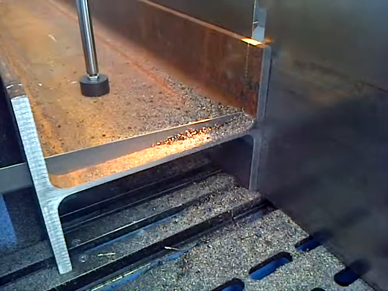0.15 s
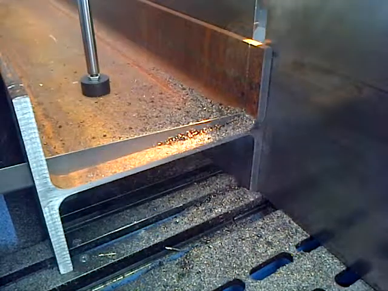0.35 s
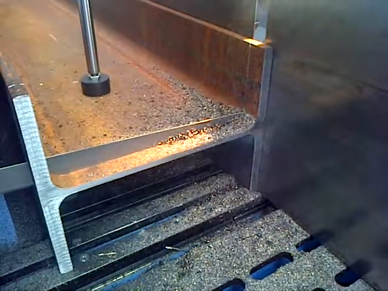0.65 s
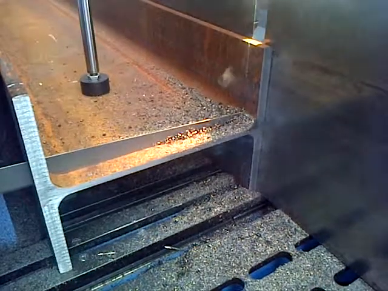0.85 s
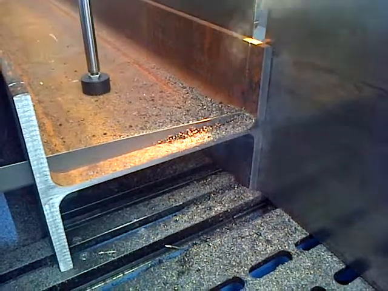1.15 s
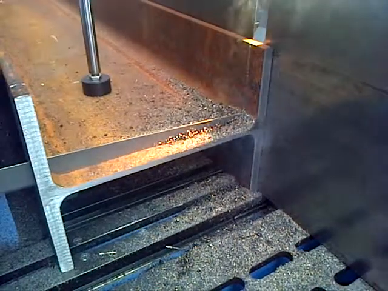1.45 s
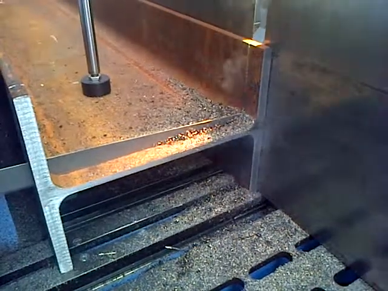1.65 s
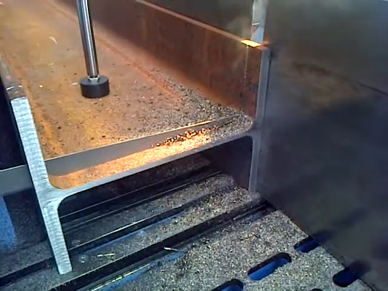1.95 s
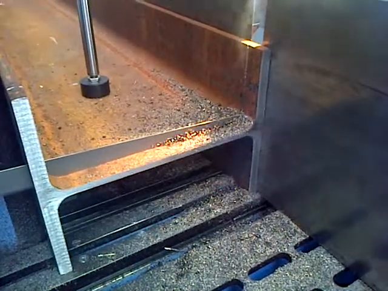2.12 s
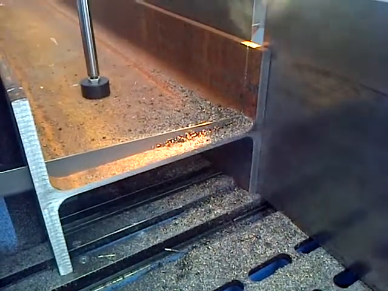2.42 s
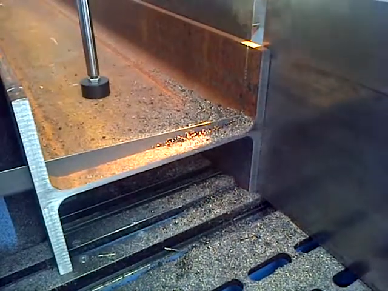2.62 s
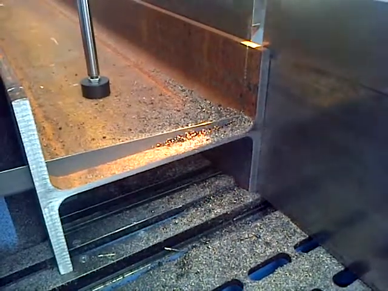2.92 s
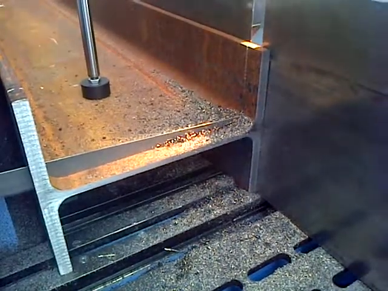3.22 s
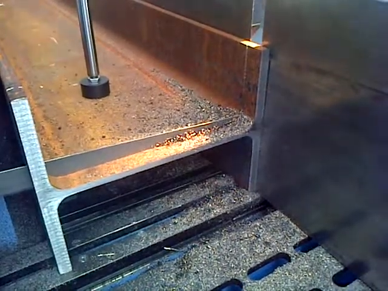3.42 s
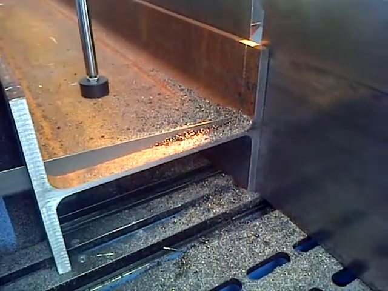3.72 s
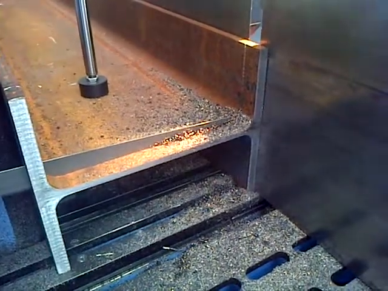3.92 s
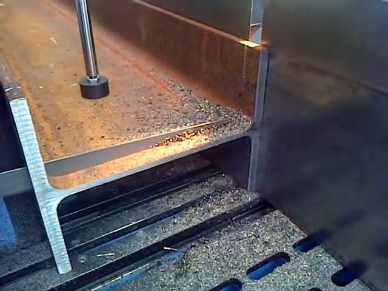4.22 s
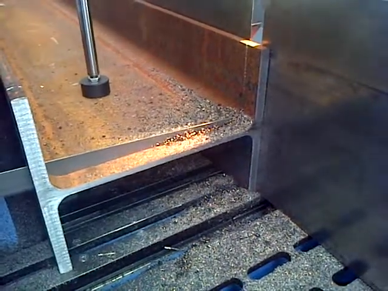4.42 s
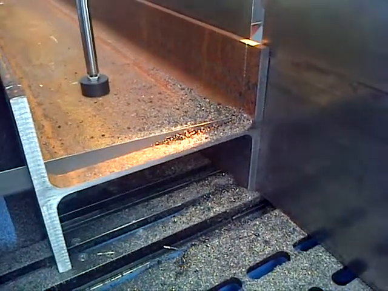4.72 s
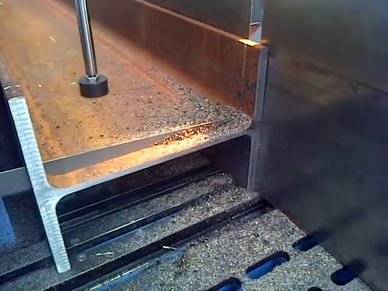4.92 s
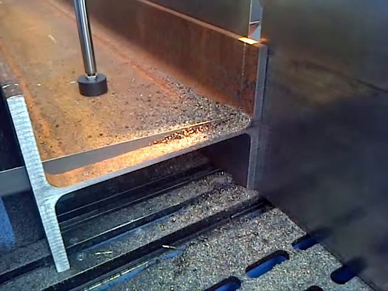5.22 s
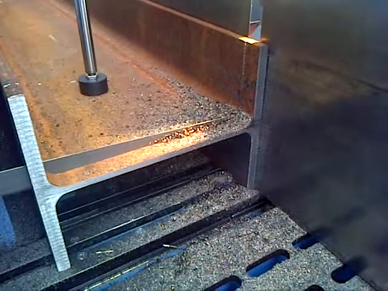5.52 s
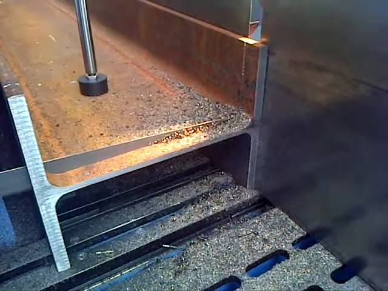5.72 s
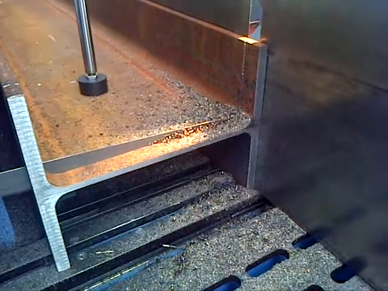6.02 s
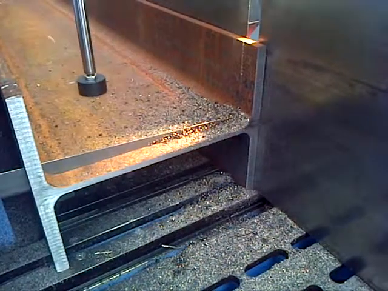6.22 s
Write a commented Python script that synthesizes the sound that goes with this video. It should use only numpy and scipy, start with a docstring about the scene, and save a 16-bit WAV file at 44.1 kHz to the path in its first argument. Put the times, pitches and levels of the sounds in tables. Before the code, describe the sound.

Steady sawing of a steel beam in a workshop: dense midrange hiss, faint ringing tones, pulsing low hum, then growing tooth chatter and rough whining.

```python
"""A band saw works through a steel beam in a workshop: noise and small cracks make an even hiss of chips. At
first roughened tones hold for a while and fade, over a motor hum with a slow beat in it. Brief pure notes and
gritty snags stand out now and then. From about two seconds a faint chatter builds up, a cycle of partials
repeating with the tooth pattern, and the hum grows with it. One partial of the chatter whines, swelling in
rough bursts through the second half. Low rumble lies beneath it all."""
import sys
import numpy as np
from scipy import signal
from scipy.fft import rfft, irfft
from scipy.io import wavfile
from scipy.ndimage import map_coordinates

SR = 44100
rng = np.random.default_rng(int(sys.argv[2]) if len(sys.argv) > 2 else 0)


def master(y):
    """Save y as 16-bit WAV."""
    cut = np.clip(np.atleast_2d(y).T, -1, 1)
    pcm = np.round(cut * 32767)  # scale
    wavfile.write(sys.argv[1], SR, pcm.astype(np.int16))


N = 280476
T = np.arange(N) / SR  # time, s

# slow course of the cutting force, as a level: time_s, level_db
FORCE_COURSE = [(0, -18.5), (.8, -19), (2, -19), (2.9, -19.5), (3.9, -19), (4.6, -19), (5.2, -19),
                (6.36, -19)]
# brief rises and dips in the loudness of the cut: centre_s, change_db, half_length_s
LOUDNESS_BUMPS = [(0.01, 2, 0.04), (0.157, 1, .03), (0.278, 1, 0.021), (0.355, -1, .025),
                  (.497, 1.5, 0.034), (.587, -0.5, 0.023), (.65, 1.6, 0.021), (0.77, -1, 0.018),
                  (0.943, 2, 0.028), (1.015, -0.8, .025), (1.077, 1, 0.033), (1.46, -0.5, 0.051),
                  (1.606, 1.5, 0.022), (1.703, 1.5, 0.02), (1.765, -0.7, .025), (1.91, -2, 0.022),
                  (1.953, 1.5, .02), (2.086, 1.4, 0.023), (2.348, 0.5, .03), (2.496, -1, 0.025),
                  (2.702, 1.5, 0.023), (3.063, -1.5, 0.026), (3.223, 0.9, 0.023), (3.341, -1.2, 0.019),
                  (3.508, -2, 0.065), (3.623, 1.5, 0.023), (3.97, -1, 0.014), (4.116, 1, 0.049),
                  (4.21, -1, 0.018), (4.754, 1.5, 0.026), (4.886, 1, .03), (5.008, -0.5, 0.047),
                  (5.422, -0.9, 0.022), (5.71, -1, .025), (5.81, 0.9, .045), (6.145, 1.1, 0.027)]
# relative spectrum of the chip hiss: frequency_hz, density_db (per Hz)
HISS_SPECTRUM = [(120, -49.5), (200, -22), (270, -9), (350, -4.5), (500, -3), (900, -2.5), (1300, -2.5),
                 (1750, 0), (2250, -2.5), (2600, -6.5), (3500, -11.5), (4300, -13), (5800, -27),
                 (7000, -35.5)]
# resonances and dips of the beam that colour the hiss: centre_hz, width_hz, boost_db
BEAM_RESONANCES = [(348, 19, -1.5), (422, 20, -4), (482, 33, 3), (720, 60, -1.5), (906, 35, -2.5),
                   (1677, 67, 1), (2120, 70, -1.5), (2270, 88, 1.5), (2423, 77, -2.5), (2620, 50, 1.5),
                   (2750, 51, -2.5), (3290, 110, 1), (3465, 70, -2), (3560, 150, 1.5), (3980, 130, 1.5),
                   (4240, 50, 1.5), (4170, 140, 1.5), (4900, 55, 5.5), (5190, 110, 4.5), (5440, 90, 0),
                   (6200, 90, 3.5)]
# pitch of the blade's bright resonance in the slot: time_s, pitch_hz
SLOT_PITCH = [(0.0, 2970), (1.43, 3164), (3.79, 3120), (4.76, 3046), (6.36, 3060)]
# strength of the slot's resonance against the hiss: time_s, level_db
SLOT_LEVEL = [(0, -8), (.3, -5.5), (.55, -9.5), (1.1, -6.5), (1.35, -11.5), (1.6, -9), (2.3, -7), (2.7, -8),
              (3.25, -9), (3.55, -11), (3.8, -10), (4.25, -9.5), (4.55, -10.5), (4.85, -10), (5.05, -11.5),
              (5.3, -11), (5.65, -10), (5.82, -8.3), (6.36, -11)]
# roughened tones that hold for a while and fade, level before the cut's loudness acts:
# start_s, end_s, pitch_hz, width_hz, level_db (rms)
HELD_TONES = [(-0.14, .93, 596, 5.7, -31), (0.73, 1.89, 597, 4.06, -28), (-.5, .58, 617, 8.8, -27.5),
              (-.8, 2.1, 843, 6, -32), (-0.5, 1.44, 893, 7, -34.5), (1.6, 3.6, 893, 4, -36.5),
              (-.8, 1.4, 1066, 4, -30.5), (1.5, 2.15, 1066, 4, -32), (-1.5, 1.6, 990, 10, -33),
              (-.5, 2.06, 1030, 13.9, -34), (3, 3.2, 951, 4, -37), (5, 5.55, 759, 4, -30.5),
              (2, 4.4, 818, 13.85, -35.5), (0.5, 3.1, 1974, 10, -33), (0, 1.5, 2045, 12, -34.5),
              (2, 3.05, 2008, 14, -33.5), (0.5, 1.3, 2128, 10, -37), (0, 1.4, 2210, 10, -34),
              (-0.5, 0.41, 1635, 14, -29), (.1, 2.8, 1695, 16.1, -35.5), (1.3, 3.1, 1778, 16, -35),
              (3.5, 4.66, 1558, 9, -34.5), (3, 4.6, 1634, 9, -33.5), (3.5, 4.4, 1785, 5.9, -37),
              (3.5, 4.8, 1915, 16.1, -35), (5.5, 6.15, 1787, 9.3, -31)]
# hum of the motor and coolant pump, level before the load acts: pitch_hz, level_db (rms)
HUM_LINES = [(150, -62.5), (200, -56), (249.9, -36), (449.9, -37), (499.8, -35.5), (599.4, -37.5)]
# one line of the hum comes and goes: time_s, level_db (rms)
DRONE_LEVEL = [(0, -38), (1.4, -38), (2.12, -41), (2.35, -31.5), (2.75, -30.5), (3, -41), (3.25, -33),
               (3.42, -45), (3.6, -31), (3.8, -40), (5, -41), (5.35, -37), (6.36, -41.5)]
# crests of the throb, where a second tone falls in step with the hum line: crest_s, level_db (rms)
THROB_CRESTS = [(-.15, -37), (.36, -29.5), (.88, -30.5), (1.35, -29.5), (1.85, -31.5), (2.34, -26),
                (2.8, -28.5), (3.3, -27), (3.83, -26), (4.32, -26.5), (4.86, -29), (5.33, -24.5),
                (5.75, -24.5), (6.22, -29), (6.7, -28)]
# relative spectrum of the workshop rumble: frequency_hz, density_db (per Hz)
SHOP_SPECTRUM = [(20, 1.5), (60, -4.5), (130, 1.5), (300, -5), (1000, -22)]
# a tooth snags on a chip: start_s, centre_hz, width_hz, peak_db, length_s
SNAGS = [(.255, 3200, 250, -26, .03), (3.208, 1900, 900, -16, 0.0072), (3.216, 840, 400, -26, 0.068),
         (3.225, 800, 900, -16, .005), (5.78, 3100, 150, -28, .04), (5.78, 1790, 120, -26, .13)]
# brief, nearly pure notes that stand out of the cut and hum:
# centre_s, pitch_hz, glide_hz_per_s, peak_db (rms), half_length_s
BRIEF_NOTES = [(.273, 832, 0, -24.5, .035), (.505, 1070, 0, -24, 0.038), (.52, 853, 0, -27.5, .04),
               (.633, 1981, -0.5, -27, .03), (.94, 837, 0, -28, .035), (1.179, 1066, 0, -27, .04),
               (2.072, 755, -700, -22, 0.025), (2.898, 377, 0, -25.5, 0.037),
               (2.896, 1955, -500, -24, .025), (3.267, 600, 0, -27, .04), (3.396, 1570, 0, -28.5, .035),
               (3.779, 1630, 0, -26, .035), (4.058, 894, 0, -28, .035), (5.85, 599, -1, -28, 0.055),
               (5.306, 1314, 0, -28, .03), (5.514, 2230, 0, -28, .03)]
# strongest partials of the chatter, level before its build-up and the cut's loudness act:
# multiple (of the tooth pattern rate), level_db (rms)
CHATTER_PARTIALS = [(27, -37), (30, -33.5), (33, -37), (36, -38.5), (37, -38), (40, -33.5), (41, -36.5),
                    (42, -36.5), (45, -33), (46, -37.5), (48, -38), (51, -32.5), (52, -35), (54, -36),
                    (55, -36), (56, -37), (57, -37), (60, -34), (66, -37.5), (71, -37), (72, -35.5),
                    (74, -37), (76, -38.5), (78, -31.5), (79, -36), (81, -38.5), (84, -34.5), (85, -39),
                    (90, -36), (99, -35), (104, -37.5), (105, -37), (108, -38.5), (110, -35.5),
                    (120, -36.5), (127, -38), (129, -37.5), (132, -38), (149, -40), (150, -38.5),
                    (153, -40)]
# swells of the whine: centre_s, extra_db, half_length_s
WHINE_SWELLS = [(3.76, 3.5, .07), (4.07, 6, 0.086), (4.702, 6, 0.11), (4.876, 8, 0.046), (5.35, 5.3, .1),
                (5.596, 10.5, 0.12), (6.147, 7, 0.14)]

PATTERN_HZ = 14.887  # how often the tooth pattern comes round
# the chatter's gain climbs in a straight line from a faint start to full strength
CHATTER_FROM_S, CHATTER_BUILD_S, CHATTER_FAINT_DB = 1.77, 2.58, -18
CHATTER_LOW_HZ = 300  # the beam radiates little of the chatter below this
LIGHT_LOAD_DB, FULL_LOAD_DB, LOAD_RISE_S = -4.5, -1.6, 0.45  # the hum rises as the chatter sets in
DRONE_HZ, THROB_HZ = 400.5, 300.05
WHINE_MULTIPLE = 69  # of the tooth pattern rate
WHINE_DB = -29.5  # at full chatter, between swells
EDGE_HZ = 7150  # top of the sound's band


def amp(db):
    """Decibels to gain."""
    return np.exp(np.asarray(db) * (np.log(10) / 20))


def evened(x):
    """Scales to rms 1."""
    return x / np.sqrt(np.mean(x ** 2) + 1e-20)


def curve(rows):
    """Reads a timed table at every sample."""
    return np.interp(T, *np.transpose(rows))


def read(points, hz):
    """Reads a spectrum table on a log-frequency axis, in dB."""
    table_hz, db = np.transpose(points)
    return np.interp(np.log(hz + 1), np.log(table_hz + 1), db)


def colour(x, points):
    """Filters by a spectrum table; rms 1."""
    gain = amp(read(points, np.fft.rfftfreq(N, 1 / SR)))
    return evened(irfft(rfft(x) * gain, N))


def drift(rate_hz, size=4096):
    """Smooth random wander that fades out above rate_hz; rms 1."""
    hz = np.fft.rfftfreq(size, T[-1] / size)
    keep = np.exp(-(hz / rate_hz) ** 2) * (hz > 0)
    slow = irfft(rfft(rng.standard_normal(size)) * keep)
    return np.interp(T, np.linspace(0, T[-1], size), evened(slow))


def swell(s, half_s):
    """A smooth bump of height 1 around a moment."""
    return np.exp(-np.minimum(((T - s) / half_s) ** 2, 20))


def resonate(x, hz, width):
    """A steep resonance whose pitch may move; rms 1."""
    turn = np.exp(2j * np.pi * np.cumsum(hz * np.ones(N)) / SR)
    r = np.exp(-np.pi * width / SR)
    # shift the pitch down to zero, low-pass there, shift back up
    narrow = signal.lfilter([(1 - r) ** 2], [1, -2 * r, r * r], x / turn)
    return evened((turn * narrow).real)


def roughened(phase, width_hz, rough):
    """A tone jostled in strength and phase; rough is the jostled share of its power. Rms about 1."""
    share = np.clip(rough, 0, 1)
    steady = np.sqrt(2 * (1 - share)) * np.cos(phase)
    jostle = drift(width_hz) * np.cos(phase) + drift(width_hz) * np.sin(phase)
    return steady + np.sqrt(share) * jostle


def tooth_pulses(turns, multiples):
    """Sum of slow cosines at multiples of the tooth pattern rate, each starting at random."""
    return sum(np.cos(2 * np.pi * (k * turns + rng.random())) for k in multiples)


def cut_loudness(flutter_db=0.5, flutter_hz=30):
    """Gain of the cut from moment to moment: brief rises and dips on top of a fine flutter."""
    bumps_db = sum(db * swell(s, half_s) for s, db, half_s in LOUDNESS_BUMPS)
    return amp(bumps_db + flutter_db * drift(flutter_hz))


def scrape(turns, depth=0.11, chips_per_s=700, chip_size=2.1):
    """Friction noise pulses as groups of teeth enter the steel, with small cracks as chips break off."""
    pulse = 1 + depth * tooth_pulses(turns, (2, 5, 6, 12, 15, 18)) / 2
    chips = (rng.random(N) < chips_per_s / SR) * rng.choice([-1, 1], N) * chip_size
    return pulse * (rng.standard_normal(N) + chips)


def surfaces(x, count=12, echo=0.068, longest_s=0.016, sway_hz=1.18):
    """Early echoes from beam, table and housing; the swaying blade makes them ripple the spectrum."""
    delays = (rng.uniform(0.118, 1, count) * longest_s * SR).astype(int)
    echoes = sum(drift(sway_hz) * np.roll(x, d) for d in delays)
    return evened(x + echo * echoes)


def beam(x):
    """The beam rings along with whatever scrapes it, lifting some bands and dulling others."""
    f = np.fft.rfftfreq(N, 1 / SR)
    boost_db = sum(db / (1 + (2 * (f - hz) / width) ** 2) for hz, width, db in BEAM_RESONANCES)
    return irfft(rfft(x) * amp(boost_db), N)


def cutting(turns, hiss_db=0, slot_width_hz=480):
    """The scrape sounds as a broad hiss and through the slot's resonance; both follow the cutting force."""
    hiss = amp(hiss_db) * colour(beam(surfaces(scrape(turns))), HISS_SPECTRUM)
    bright = resonate(surfaces(scrape(turns)), curve(SLOT_PITCH), slot_width_hz)
    return amp(curve(FORCE_COURSE)) * (hiss + amp(curve(SLOT_LEVEL)) * bright)


def held_tones(rough=0.35, jostle_widths=2.6, wander_widths=0.3996, wander_hz=4, fade_s=0.2):
    """Roughened tones that hold for a while and fade; each wanders in pitch and breaks up."""
    out = np.zeros(N)
    for start, end, hz, width, db in HELD_TONES:
        # start and end fall halfway through the fades
        held = np.clip(np.minimum(T - start, end - T) / fade_s + 0.5, 0, 1)
        pitch = hz + wander_widths * width * drift(wander_hz)
        phase = 2 * np.pi * np.cumsum(pitch) / SR
        out += amp(db) * held * roughened(phase, jostle_widths * width, rough)
    return out


def build_up(length_s):
    """Rises evenly from 0 to 1 once the chatter sets in."""
    return np.clip((T - CHATTER_FROM_S) / length_s, 0, 1)


def motor(waver_db=1.5, waver_rad=0.19):
    """Magnetic hum in gently wavering lines that rises with the load."""
    hum = np.zeros(N)
    for hz, db in HUM_LINES:
        level = amp(db + waver_db * drift(1.5))
        phase = 2 * np.pi * (hz * T + rng.random()) + waver_rad * drift(5.7)
        hum += level * np.cos(phase)
    load_db = LIGHT_LOAD_DB + (FULL_LOAD_DB - LIGHT_LOAD_DB) * build_up(LOAD_RISE_S)
    return np.sqrt(2) * amp(load_db) * hum


def drone(rough=0.11, jostle_hz=9):
    """The unsteady line of the hum: a jostled tone that comes and goes."""
    phase = 2 * np.pi * (DRONE_HZ * T + rng.random())
    return amp(curve(DRONE_LEVEL)) * roughened(phase, jostle_hz, rough)


def throb(partner_db=-4.0, crest_db=2.0, crest_s=0.14, waver_db=1.6, waver_rad=0.24, waver_hz=12):
    """A second, unsteady tone slips one cycle behind a hum line from crest to crest, so the two beat."""
    mains = 2 * np.pi * (THROB_HZ * T + rng.random())
    crest_times = [s for s, db in THROB_CRESTS]
    slip = 2 * np.pi * np.interp(T, crest_times, np.arange(len(crest_times)))
    partner_level = amp(partner_db + waver_db * drift(waver_hz))
    partner = partner_level * np.cos(mains - slip + waver_rad * drift(waver_hz))
    # lower the level between crests to keep each crest short
    crests = sum(swell(s, crest_s) for s in crest_times)
    level_db = curve(THROB_CRESTS) + crest_db * (crests - 1)
    return np.sqrt(2) * amp(level_db) * (np.cos(mains) + partner) / (1 + amp(partner_db))


def workshop(level_db=-62):
    """Steady rumble of the workshop: noise weighted to the lows."""
    return amp(level_db) * colour(rng.standard_normal(N), SHOP_SPECTRUM)


def chatter_gain():
    """How hard the blade chatters, 1 at full strength."""
    faint = amp(CHATTER_FAINT_DB)
    return faint + (1 - faint) * build_up(CHATTER_BUILD_S)


def teeth(turns, depth=0.075):
    """The teeth come at three spacings, and each pulses the chatter at its own rate."""
    return 1 + depth * tooth_pulses(turns, (12, 15, 18))


def partials(turns, flutter_db=2, flutter_rad=0.22, flutter_hz=5):
    """The chatter's strongest partials; each breaks up and recovers on its own as the teeth grip and skid."""
    out = np.zeros(N)
    for multiple, db in CHATTER_PARTIALS:
        phase = 2 * np.pi * (multiple * turns + rng.random()) + flutter_rad * drift(flutter_hz)
        out += amp(db) * evened(amp(flutter_db * drift(flutter_hz)) * np.cos(phase))
    return out


def tooth_buzz(turns, size=8192, count=470, level_db=-28, uneven_db=1.2):
    """One random waveform per tooth pattern, read over and over: a dense comb of weak partials."""
    k = np.arange(1, count)
    weak = amp(read(HISS_SPECTRUM, k * PATTERN_HZ) + 1.6 * rng.standard_normal(len(k)))
    spectrum = weak * np.exp(2j * np.pi * rng.random(len(k)))
    cycle = evened(irfft(np.append(0, spectrum), size))
    level = amp(level_db + uneven_db * drift(11.0))
    return level * map_coordinates(cycle, [turns % 1 * size], order=3, mode="grid-wrap")


def chatter(turns, rasp_db=-29, rasp_hz=720, rasp_width_hz=900):
    """The same tooth pattern strikes the beam over and over, with a noisy rasp pulsing alongside."""
    rasp = colour(resonate(scrape(turns), rasp_hz, rasp_width_hz), HISS_SPECTRUM)
    pulsed = teeth(turns) * (tooth_buzz(turns) + partials(turns) + amp(rasp_db) * rasp)
    high_pass = signal.butter(6, CHATTER_LOW_HZ, "high", fs=SR, output="sos")
    return chatter_gain() * signal.sosfilt(high_pass, pulsed)


def whine(turns, rough=0.13, jostle_hz=26):
    """One partial of the chatter meets a beam resonance: it grows with the chatter and swells in bursts."""
    level_db = WHINE_DB + sum(db * swell(s, half_s) for s, db, half_s in WHINE_SWELLS)
    phase = 2 * np.pi * WHINE_MULTIPLE * turns
    return chatter_gain() * amp(level_db) * roughened(phase, jostle_hz, rough)


def snags():
    """Short, gritty bursts of resonant noise when a chip catches."""
    out = np.zeros(N)
    for s, hz, width, db, length in SNAGS:
        burst = colour(resonate(rng.standard_normal(N), hz, width), HISS_SPECTRUM)
        arch = np.sin(np.pi * np.clip((T - s) / length, 0, 1))
        out += amp(db) * arch * burst
    return out


def brief_notes():
    """Brief, nearly pure notes that stand out of the cut and hum, some sliding down."""
    out = np.zeros(N)
    for s, hz, glide, db, half_s in BRIEF_NOTES:
        near = abs(T - s) < 4 * half_s
        t = T[near] - s
        cycles = hz * t + glide * t ** 2 / 2 + rng.random()
        out[near] += amp(db) * np.exp(-(t / half_s) ** 2) * np.cos(2 * np.pi * cycles)
    return np.sqrt(2) * out


def scene(speed_wander=0.00039):
    """The blade's travel, counted in tooth patterns, drives the cut; motor and workshop lie below."""
    turns = np.cumsum(PATTERN_HZ * (1 + speed_wander * drift(1.48))) / SR
    cut = cut_loudness() * (cutting(turns) + held_tones() + chatter(turns))
    accents = whine(turns) + snags() + brief_notes()
    machine = motor() + drone() + throb()
    return (cut + accents + machine + workshop())[None]


def record(dry):
    """A steep low-pass closes off the treble."""
    low_pass = signal.firwin(451, EDGE_HZ, window=("kaiser", 9), fs=SR)
    return signal.oaconvolve(dry, low_pass[None], "same")


dry = scene()
out = record(dry)
master(out)
```